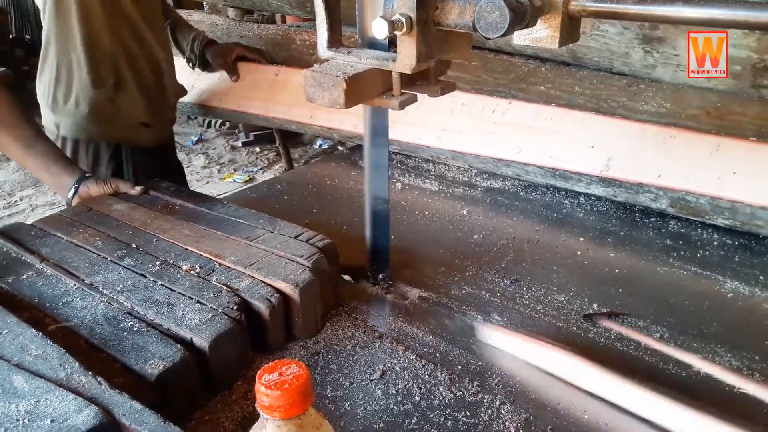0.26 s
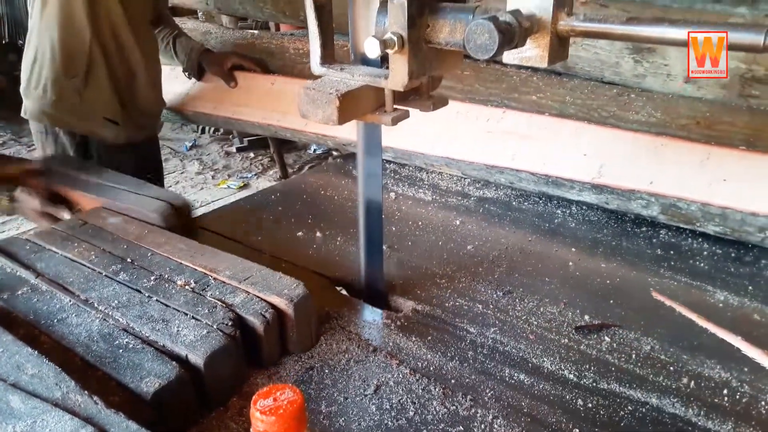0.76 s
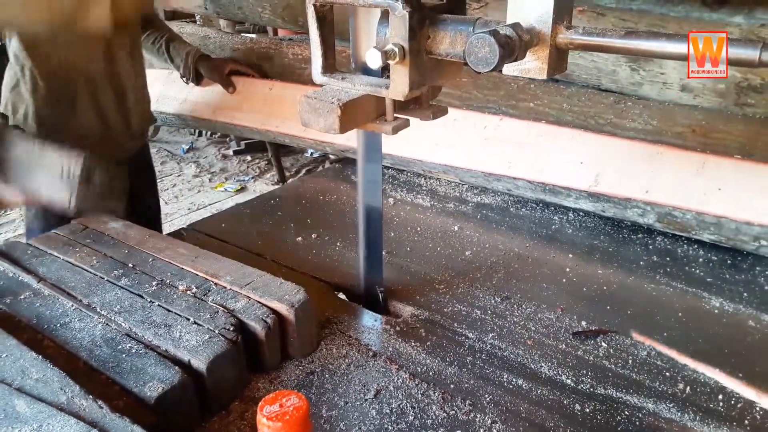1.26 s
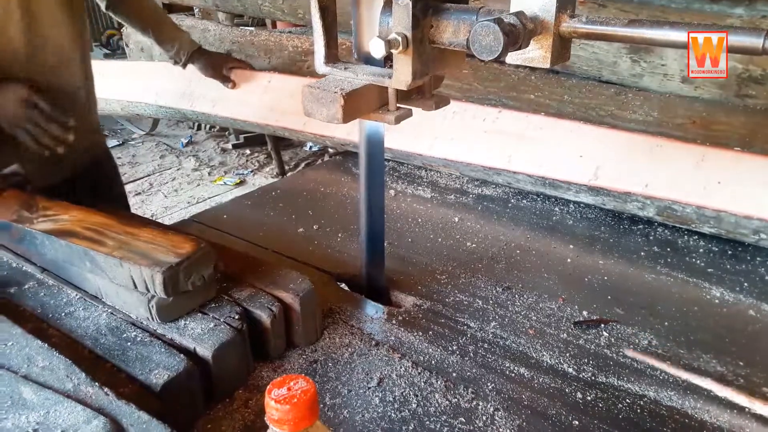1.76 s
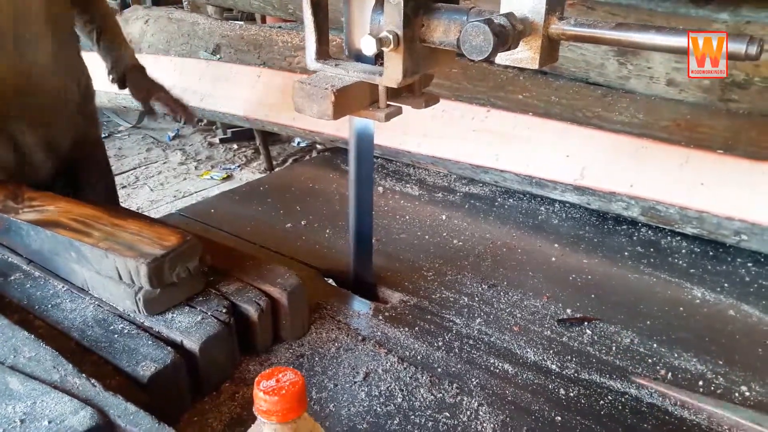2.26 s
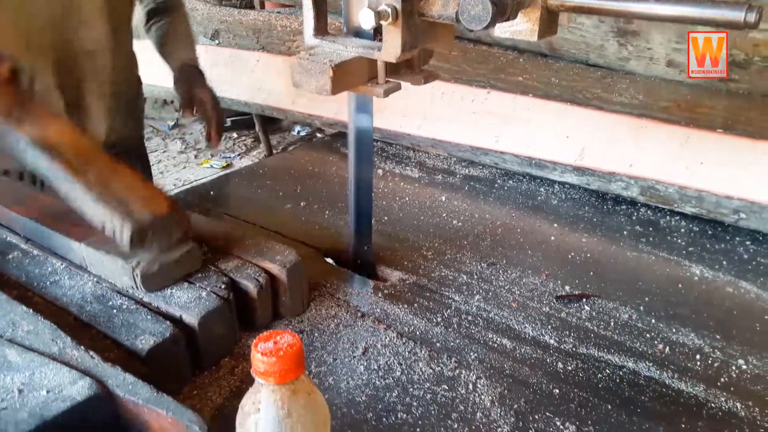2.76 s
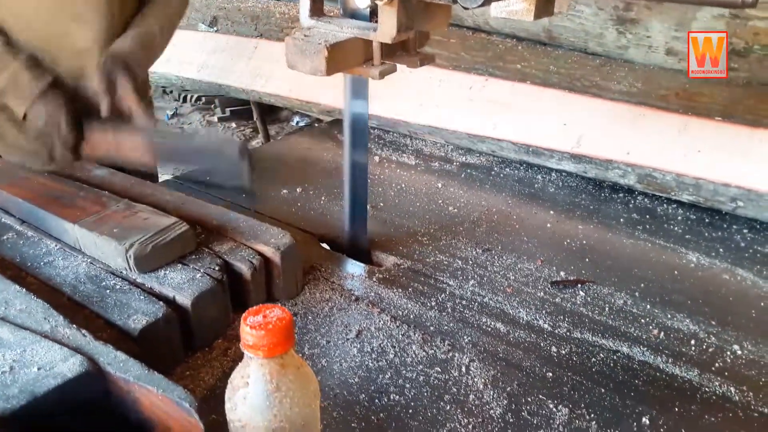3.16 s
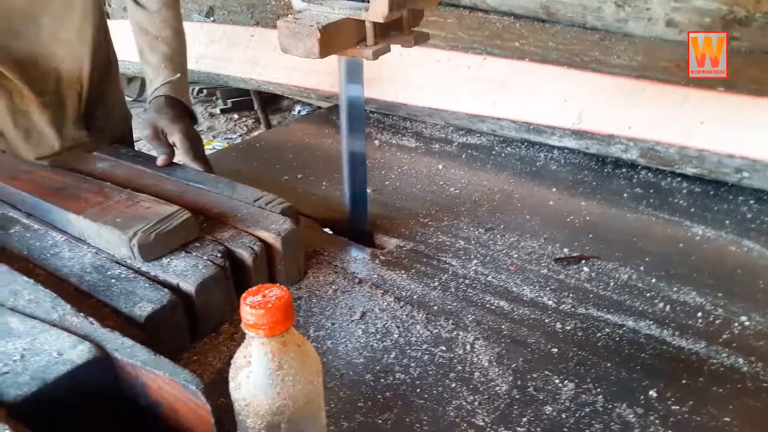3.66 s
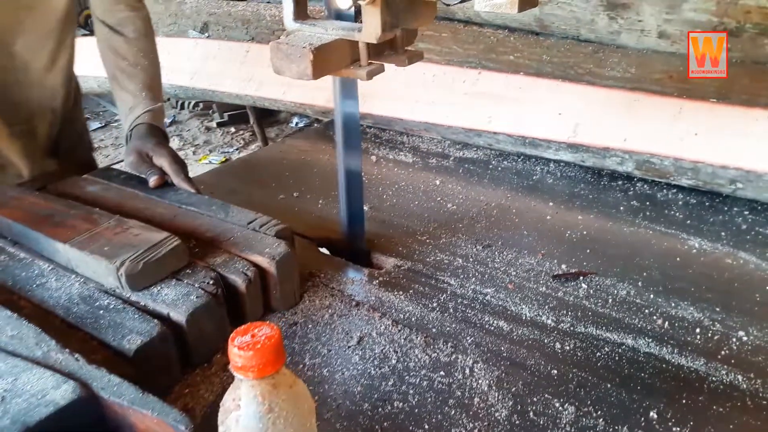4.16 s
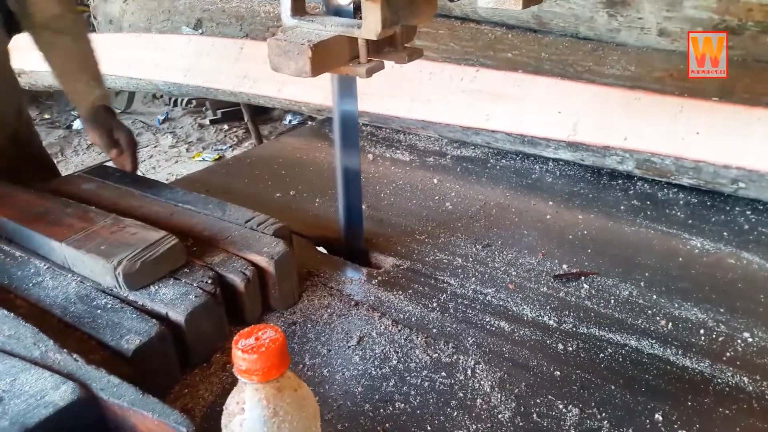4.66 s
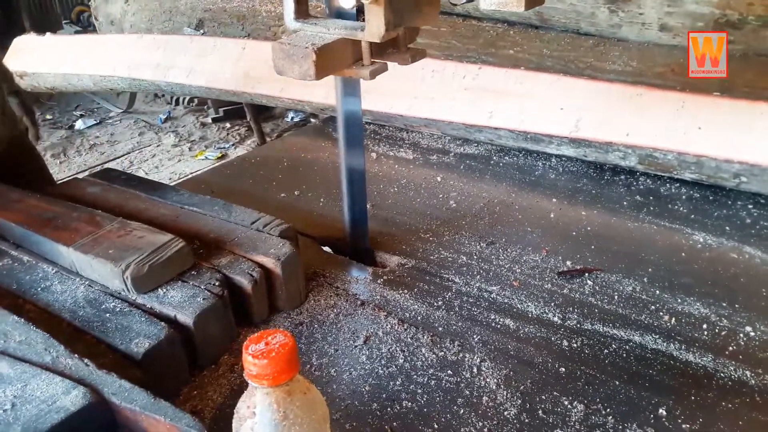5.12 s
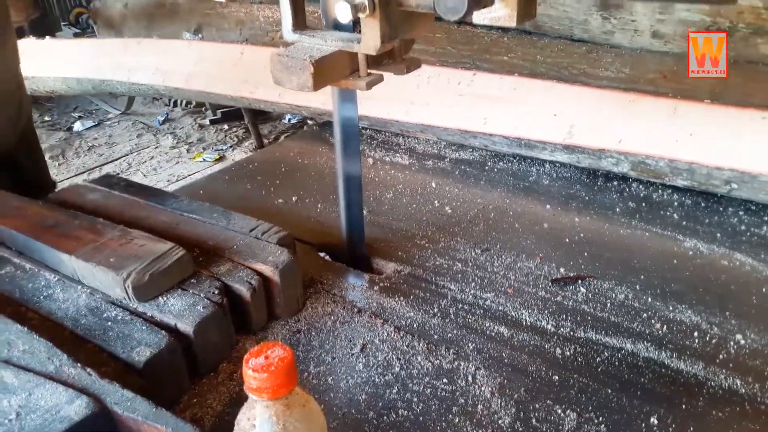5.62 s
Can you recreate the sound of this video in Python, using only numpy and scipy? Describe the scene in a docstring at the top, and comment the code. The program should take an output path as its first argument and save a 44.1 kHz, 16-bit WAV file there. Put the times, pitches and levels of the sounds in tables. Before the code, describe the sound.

Close idling sawmill blade, harsh rattling hiss over faint motor hum, with a short opening squeal and one hard wooden knock midway.

```python
"""Open shed, two microphone ports close to a sawmill band saw running free over a low motor hum.
The saw is noise rattling in bands and driving the resonances of housing, blade and wheels.
At first a sawn piece squeals (wavering tones with overtones) and scrapes (noise) off the blade.
Later a block of wood is dropped on the table and nudged: struck modes, cracks and thuds, with
a short reverberation from the shed. A look-ahead limiter ducks the loud moments."""
import sys
import numpy as np
from scipy import signal
from scipy.io import wavfile
from scipy.ndimage import uniform_filter1d

SR = 44100
rng = np.random.default_rng(int(sys.argv[2]) if len(sys.argv) > 2 else 0)


def pcm_store(signal):
    """Save signal as 16-bit PCM."""
    levels = np.round(np.clip(np.atleast_2d(signal), -1, 1) * 32767)
    wavfile.write(sys.argv[1], SR, levels.astype(np.int16).T)


N = 259749  # samples
SIDES = np.array([[1], [-1]])  # left, right port


def from_db(db):
    """Amplitude factor for a level in dB."""
    return 10 ** (np.asarray(db) / 20)


def rms_one(x):
    """Scale to an rms of 1."""
    return x / np.sqrt(np.mean(x ** 2) + 1e-20)


def in_time(rows):
    """Draw each column after t/s as a curve over the whole scene."""
    seconds, *columns = np.transpose(rows)
    return [np.interp(np.arange(N) / SR, seconds, column) for column in columns]


def at_hz(points, hz):
    """Read a table of f/Hz and value along a logarithmic frequency axis."""
    table_hz, values = np.array(points).T
    return np.interp(np.log(hz), np.log(table_hz), values)


def band_filter(x, order, cutoff_hz, kind):
    """Butterworth filter."""
    return signal.sosfilt(signal.butter(order, cutoff_hz, kind, fs=SR, output="sos"), x)


def drift(rate_hz):
    """Slow chance, spread 1: noise at every 40th sample through a double one-pole low-pass."""
    step = 40
    r = np.exp(-2 * np.pi * rate_hz * step / SR)
    white = rng.standard_normal(N // step + 2002)
    slow = signal.lfilter([1], [1, -2 * r, r * r], white)[2000:]  # drop the filter's start
    return np.interp(np.arange(N) / step, np.arange(len(slow)), rms_one(slow))


def two_pole(x, hz, r, zeros):
    """Resonance at one pitch; pole radius r sets how long it rings."""
    return signal.lfilter(zeros, [1, -2 * r * np.cos(2 * np.pi * hz / SR), r * r], x)


def resonate(x, hz, width_hz):
    """Two-pole resonance of a given width, driven by a steady sound."""
    r = np.exp(-np.pi * width_hz / SR)
    return two_pole(x, hz, r, [1 - r, 0, r - 1])


def strike(at, level_db, hz, t60):
    """Clicks at the given samples set one mode ringing, down 60 dB after t60 seconds."""
    clicks = np.full(N, 1e-18)
    clicks[at] = from_db(level_db)
    return two_pole(clicks, hz, from_db(-60 / (t60 * SR)), [.5, 0, -.5])


def swell(start, hold, level_db, rise, fall_db_s):
    """Rise, hold (times in s), then a steady fall in dB."""
    t = np.arange(N) / SR - start
    fall_db = fall_db_s * np.maximum(t - rise - hold, 0)
    return np.clip(t / rise, 0, 1) * from_db(level_db - fall_db)


# Likeness of the two ports: [f/Hz, likeness 0 to 1]
PORT_LIKENESS = [(30, 1), (110, 1), (300, 1), (520, 0.85), (900, 0.73), (1150, 0.52), (1900, 0.31),
                 (2800, 0.26), (4000, 0.48), (7000, 0.13), (15000, 0.097)]
# Balance of the two ports: [f/Hz, left minus right level/dB]
PORT_BALANCE = [(60, -6), (110, 3), (200, -2.5), (380, -0.5), (700, -1.5), (1290, 1.5), (2380, -3),
                (4400, -3.5), (8120, -3), (15000, 2)]


def spread(shared_own, hz, nearness=0):
    """Direct sound is shared by both ports, shed reflections differ between them."""
    alike = np.clip(at_hz(PORT_LIKENESS, hz) - nearness, 0, 1)  # a very near source is less alike
    shared, own = shared_own
    pair = np.sqrt(1 + alike) * shared + np.sqrt(1 - alike) * own * SIDES
    return pair * from_db(at_hz(PORT_BALANCE, hz) / 2 * SIDES) / np.sqrt(2)


def banded_noise(spectrum, wobble_db, patchy_db, bright_db, nearness=0):
    """Third-octave bands of noise; the treble shares the wobble, each band flickers alone; rms 1."""
    out = 0
    edges = 25 * 2 ** (np.arange(29) / 3)  # Hz
    white = rng.standard_normal((2, 2, N))  # neighbouring bands use different noise
    for k, (low, high) in enumerate(zip(edges, edges[1:])):
        band = band_filter(white[k % 2], 2, [low, high], "band")
        hz = np.sqrt(low * high)
        treble = np.clip(np.log2(hz / 1000) / 3, 0, 1)  # 0 at 1 kHz, 1 from 8 kHz up
        level_db = at_hz(spectrum, hz) + treble * (wobble_db + bright_db) + patchy_db * drift(17.0)
        out = out + from_db(level_db) * spread(band, hz, nearness)
    return rms_one(out)


def ringing(modes, wobble_db, patchy_db, rate_hz, order):
    """Noise drives every mode; each swells and fades by itself. Order 2 gives steep flanks."""
    white, out = rng.standard_normal((3, 2, N)), 0
    for k, (hz, width_hz, level_db) in enumerate(modes):
        rung = white[k % 3]
        for _ in range(order):
            rung = resonate(rung, hz, width_hz)
        moving_db = level_db + wobble_db + patchy_db * drift(rate_hz)
        out = out + from_db(moving_db) * spread(rms_one(rung), hz)
    return out


def shed(x, t60=0.19):
    """A short bright reverberation off table and planks, different at each port."""
    t = np.arange(SR // 2) / SR
    tail = rng.standard_normal((2, len(t))) * from_db(-60 * t / t60) * (t > .004)
    return signal.fftconvolve(x[None], band_filter(tail, 2, 900, "high"), axes=1)[:, :N]


# Motor hum through the scene: [t/s, level/dB]
HUM_LEVEL = [(0, -58), (1, -61.5), (2.5, -51), (3.5, -54.5), (5, -46.5), (5.89, -46.5)]
HUM_HZ = 132


def hum():
    """A near sine of the motor that wavers a little, almost in step at both ports."""
    level_db, = in_time(HUM_LEVEL)
    pitch_hz = HUM_HZ + 0.87 * drift(1.46)
    phase = 2 * np.pi * np.cumsum(pitch_hz) / SR + np.array([[0], [.1]])
    return np.sqrt(2) * from_db(level_db + 1.5 * drift(6.0)) * np.sin(phase)


# Wood knocks on the table: [t/s, ring level/dB, crack level/dB, dull thud level/dB]
TABLE_KNOCKS = [(3.302, -1, 4, -40), (3.31, -9, -20, -40), (3.314, -3, -20, -30), (3.323, -10, -18, -42),
                (3.336, -38, -26, -31), (3.565, -16, -30, -55), (3.724, -28, -9, -55)]
# Modes of block and table: [f/Hz, level/dB, t60/s]
BLOCK_MODES = [(237, -14, .1), (570, -13, .07), (650, -6, .045), (727, -4, .045), (860, -10, .03),
               (1000, -6, .025), (1150, -9, .03), (1303, -6, .05), (1600, -8, .025), (1850, -2, .022),
               (2050, -3, .02), (2326, -5, .028), (2584, -4, .022)]
CRACK_T60_S = 0.019
THUD_HZ, THUD_T60_S = 106, 0.079  # the table top
DULLING = 0.17  # dB per octave of tilt about 700 Hz for each dB below the hardest knock


def knocks():
    """Each contact strikes every mode by chance strength, weak ones duller, cracks and thuds."""
    seconds, peak_db, crack_db, thud_db = np.transpose(TABLE_KNOCKS)
    at = (seconds * SR).astype(int)
    luck_db = 1.5 * rng.standard_normal((len(at), len(BLOCK_MODES)))

    clicks = np.full(N, 1e-18)
    clicks[at] = from_db(crack_db)
    decay = signal.lfilter([1], [1, -from_db(-60 / (CRACK_T60_S * SR))], clicks)
    crack = band_filter(decay * rng.standard_normal(N), 3, [550, 2650], "band")

    rings = 0
    for k, (hz, level_db, t60) in enumerate(BLOCK_MODES):
        tilt_db = DULLING * (peak_db - peak_db.max()) * np.log2(hz / 700)
        rings = rings + strike(at, peak_db + level_db + luck_db[:, k] + tilt_db, hz, t60)

    clack = band_filter(2 * crack + rings, 2, [480, 3000], "band")  # a small block radiates little bass
    thud = signal.lfilter([.05], [1, -.95], strike(at, thud_db, THUD_HZ, THUD_T60_S))  # soft onset
    return clack + thud


# Squeals of the sawn piece on the blade: [start t/s, hold/s, f/Hz, level/dB]
BLADE_SQUEALS = [(-.005, 0.016, 2240, -17), (0.026, 0.018, 3340, -18.5), (.045, 0.023, 2245, -23),
                 (0.074, .012, 3330, -26), (0.099, 0.019, 2246, -18), (.17, 0.01, 2230, -18),
                 (0.184, .01, 3540, -21)]
# Short shoves across the table: [start t/s, hold/s, level/dB]
TABLE_SHOVES = [(-.01, 0.028, -15), (0.03, 0.014, -21), (0.07, 0.0089, -16), (0.11, .01, -31),
                (0.18, 0.018, -23.5)]
# Colour of the scrape before its treble is tilted: [f/Hz, level/dB per Hz]
SCRAPE_COLOUR = [(18, -59), (30, -11), (552, -1), (1970, -14), (2250, -1), (2560, -48), (3410, -3),
                 (15000, -8.5)]
SQUEAL_RISE_S, SQUEAL_FALL_DB_S = 0.0041, 700
SHOVE_RISE_S, SHOVE_FALL_DB_S = 0.0096, 500


def offcut():
    """Stick-slip on the blade side squeals with overtones while the piece scrapes across the table."""
    waver_hz, squeal = 6 * drift(40.0), 0
    for start, hold, hz, level_db in BLADE_SQUEALS:
        phase = 2 * np.pi * np.cumsum(hz + waver_hz) / SR
        tone = np.sin(phase) + 0.5 * np.sin(2 * phase) + 0.16 * np.sin(3 * phase)
        squeal = squeal + swell(start, hold, level_db, SQUEAL_RISE_S, SQUEAL_FALL_DB_S) * tone
    shove = sum(swell(*row, SHOVE_RISE_S, SHOVE_FALL_DB_S) for row in TABLE_SHOVES)
    scrape = banded_noise(SCRAPE_COLOUR, 0, patchy_db=2.5, bright_db=-2.5, nearness=1.0)
    return np.sqrt(2) * squeal + shove * scrape


# Running saw, low after the loud moments and creeping back: [t/s, level/dB]
SAW_LEVEL = [(0, -17), (.3, -21), (1.2, -21), (1.9, -17.5), (2.6, -16.5), (3.27, -18.5), (3.36, -20.5),
             (4.3, -21.5), (4.7, -20.5), (5.2, -17), (5.89, -18)]
# Broad colour of the rattling band before its treble lift: [f/Hz, level/dB per Hz]
RATTLE_COLOUR = [(25, -77), (90, -21), (160, -12.5), (330, -21.5), (600, -11), (1200, -2), (2200, -9.5),
                 (2950, -5), (4200, -2), (5600, -6.5), (7800, -9), (9600, -21), (12200, -14.5),
                 (15600, -23.5)]
# Broad resonances of guides and wheel housing: [f/Hz, width/Hz, level/dB]
HOUSING_MODES = [(1060, 234, -14.5), (2030, 490, -15), (3300, 69, -10.5), (3461, 183, -8),
                 (3694, 230, -10.5), (3940, 110, -11.5), (4153, 140, -14), (4500, 610, -10),
                 (5250, 950, -11)]
# The housing rings more or less strongly: [t/s, added level/dB]
HOUSING_RING = [(0, 0.5), (2, 3.5), (3.5, 2), (5.89, 0.5)]
# Pitches of the narrow modes of band and wheels: [f/Hz]
BAND_PITCHES = [345, 390, 430, 500, 559, 630, 700, 730, 795, 905, 985, 1073, 1165, 1275, 1390, 1507, 1625,
                1710, 1799, 1919, 2020, 2096, 2229, 2290, 2358, 2460, 2560]
# Shape of those modes, in the same order: [width/Hz, level/dB]
BAND_SHAPES = [(10.8, -35.5), (9.2593, -36.5), (10, -29.5), (7.7, -27), (25, -21), (18, -28),
               (11.111, -23.5), (12.96, -33), (14, -20.5), (12.963, -21.5), (7.2, -16.5), (23.7, -13.5),
               (14, -18.5), (9.3, -17), (13, -18.5), (11, -19.5), (20.37, -18), (19.44, -15.5), (39, -15),
               (10, -14.5), (25, -17), (32, -11.5), (18.519, -20), (18, -16), (9.8, -16.5), (43, -18.5),
               (19, -21.5)]
WHEEL_HZ = 11.1  # wheel turns per second
BRIGHT_DB = 7.5  # lift of the rattle's treble


def saw():
    """The rattling band throbs once per wheel turn and unevenly, and sets its resonances ringing."""
    level_db, = in_time(SAW_LEVEL)
    ring_db, = in_time(HOUSING_RING)
    turn = np.sin(2 * np.pi * WHEEL_HZ * np.arange(N) / SR + .5)
    wobble_db = 0.32 * turn + 0.74 * drift(7.8) + 0.25 * drift(30.0)
    rattle = from_db(1.5) * banded_noise(RATTLE_COLOUR, wobble_db, patchy_db=1.0, bright_db=BRIGHT_DB)
    housing_db = ring_db + 1.53 * wobble_db
    housing = ringing(HOUSING_MODES, housing_db, patchy_db=0.8, rate_hz=7.6, order=2)
    band_modes = np.c_[BAND_PITCHES, BAND_SHAPES]
    band = ringing(band_modes, 0, patchy_db=1.14, rate_hz=7.3, order=1)
    return from_db(level_db) * (rattle + housing + band)


# Balance of the saw as the microphone turns slowly near the end: [t/s, left minus right level/dB]
MICROPHONE_TURN = [(0, .5), (3.8, .5), (5.89, 0)]
RIGHT_LAG, BLOCK_LAG = 2, -3  # samples at the right port; negative is early


def scene():
    """Shed, hum, wood and saw at both ports; the right one hears the block early, the rest late."""
    wood = knocks()
    turn_db, = in_time(MICROPHONE_TURN)
    turned_saw = saw() * from_db(turn_db / 2 * SIDES)
    left, right = from_db(-32) * shed(wood) + hum() + offcut() + turned_saw
    return np.array([left + wood, np.roll(right, RIGHT_LAG) + np.roll(wood, BLOCK_LAG)])


LIMIT_DB, RELEASE_DB_S, LOOK_AHEAD_S = -14, 200, .010
SQUEEZE = .55  # dB of cut for each dB over the limit
RUMBLE_CUT_HZ, CUTOFF_HZ = 45, 15640


def record(dry):
    """A look-ahead limiter ducks loud moments; peaks are rounded, rumble and top are cut."""
    power = uniform_filter1d(np.mean(dry ** 2, axis=0), size=440)  # about 10 ms
    loud_db = 10 * np.log10(power + 1e-12)
    fall_db = RELEASE_DB_S * np.arange(N) / SR
    held_db = np.maximum.accumulate(loud_db + fall_db) - fall_db  # instant rise, steady release
    cut_db = SQUEEZE * uniform_filter1d(np.maximum(held_db - LIMIT_DB, 0), size=300)
    early_cut_db = np.interp(np.arange(N) + LOOK_AHEAD_S * SR, np.arange(N), cut_db)
    ducked = dry * from_db(-early_cut_db)
    rounded = 1.1 * np.tanh(ducked / 1.1)
    clean = band_filter(rounded, 2, RUMBLE_CUT_HZ, "high")
    return signal.sosfilt(signal.ellip(14, .3, 80, CUTOFF_HZ, fs=SR, output="sos"), clean)


dry = scene()
out = record(dry)
pcm_store(out)
```